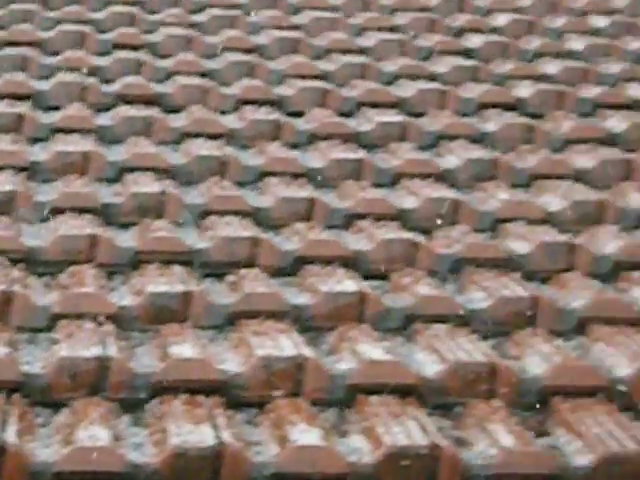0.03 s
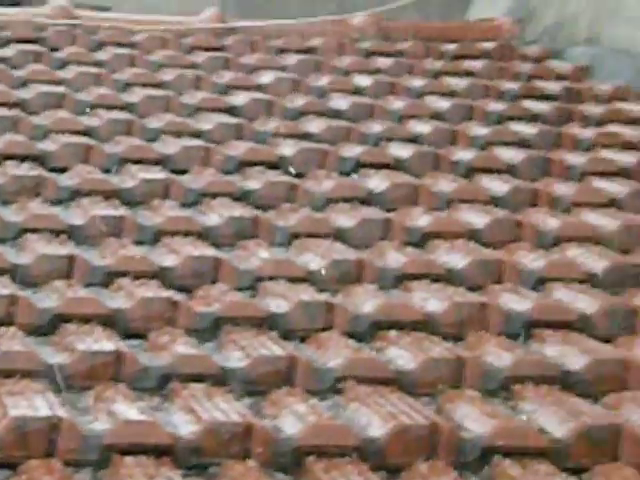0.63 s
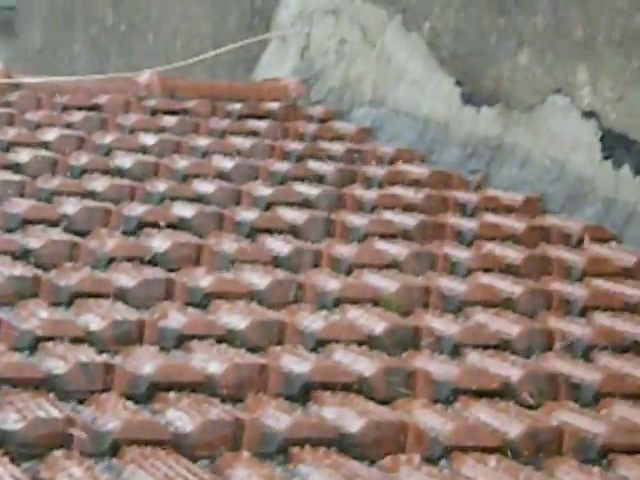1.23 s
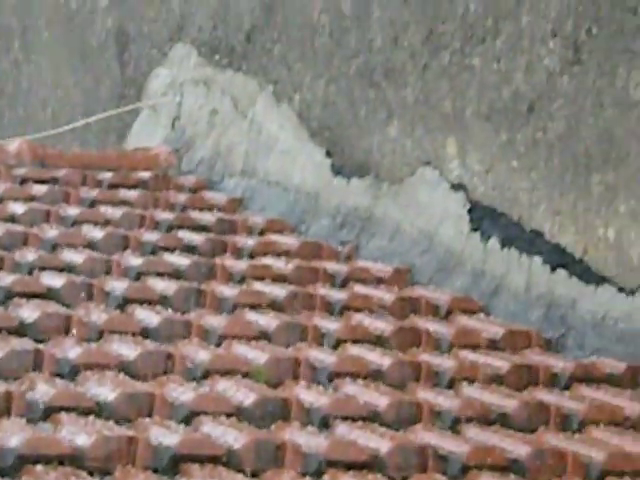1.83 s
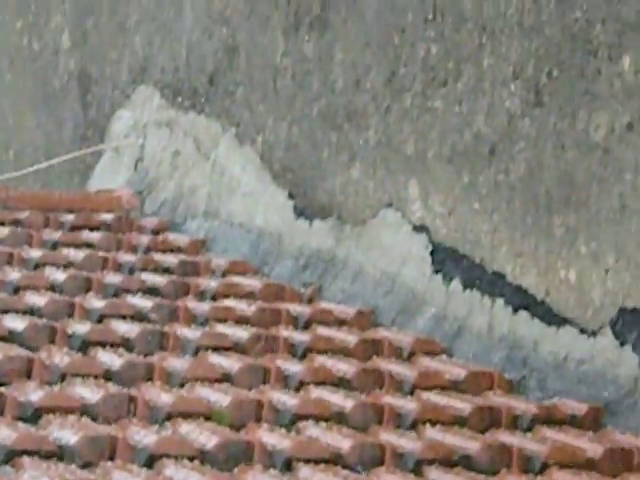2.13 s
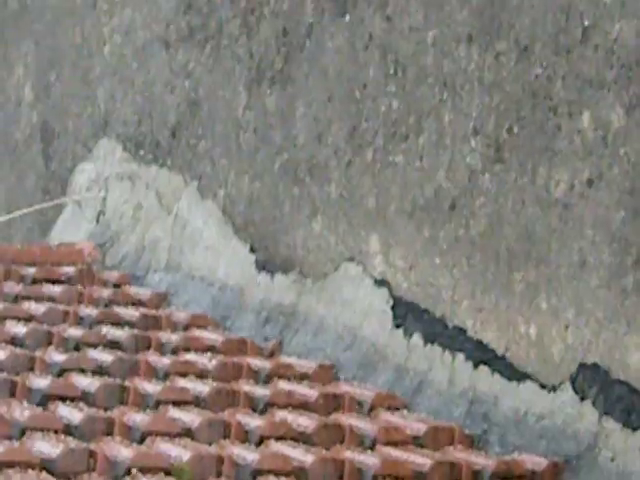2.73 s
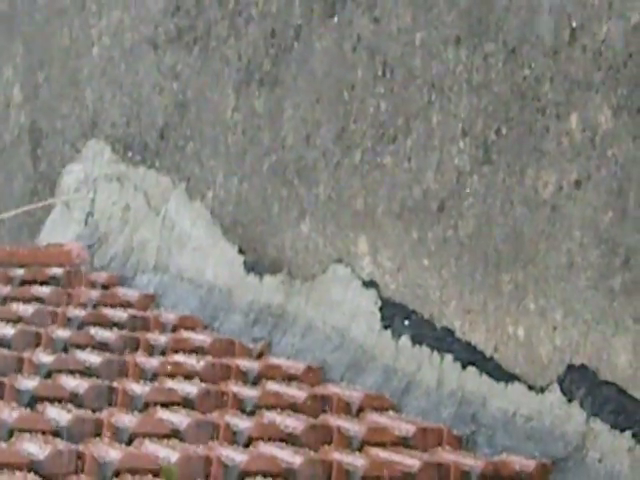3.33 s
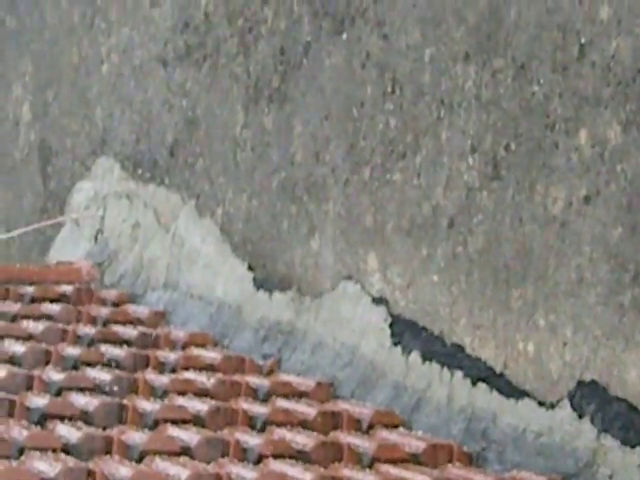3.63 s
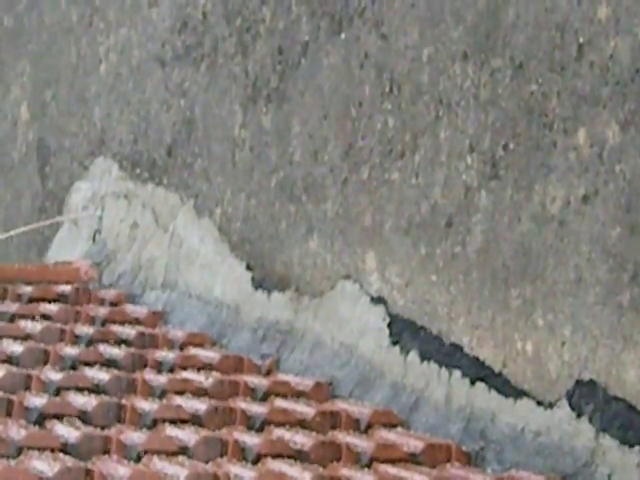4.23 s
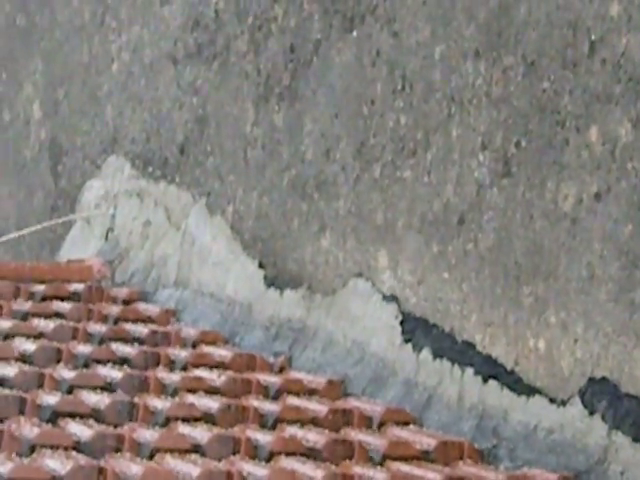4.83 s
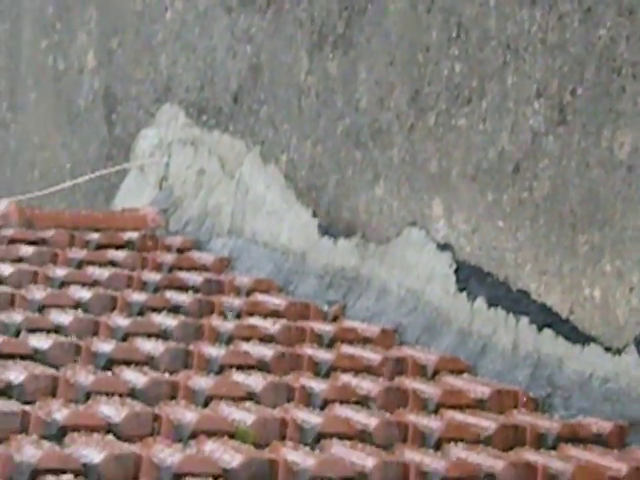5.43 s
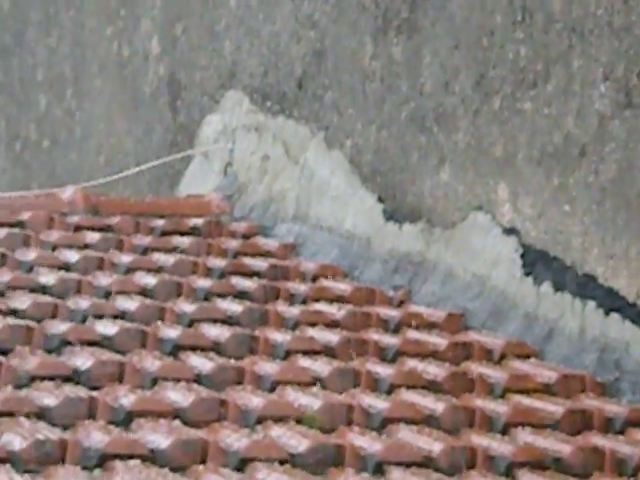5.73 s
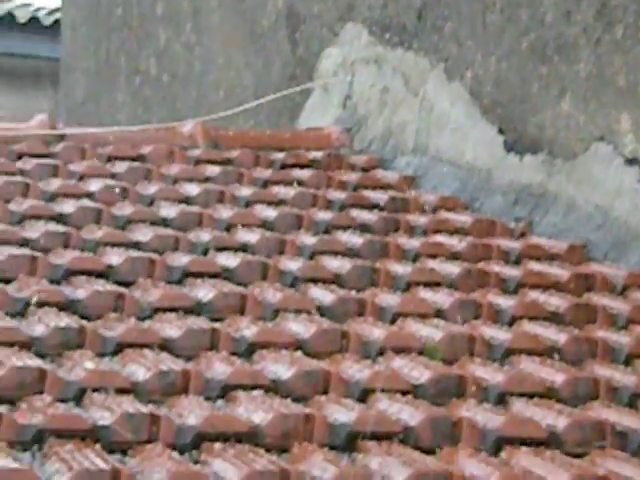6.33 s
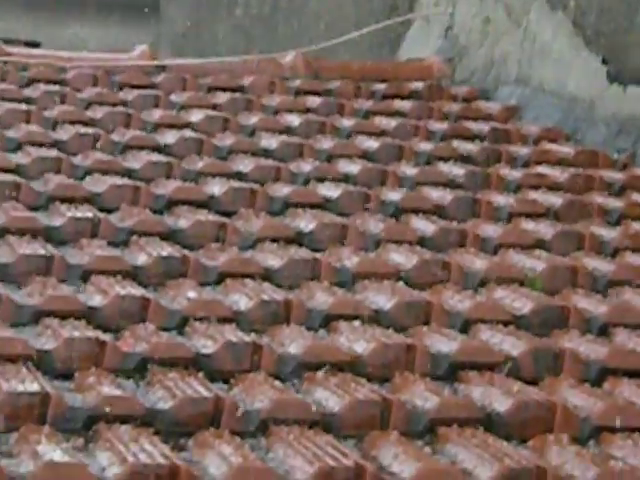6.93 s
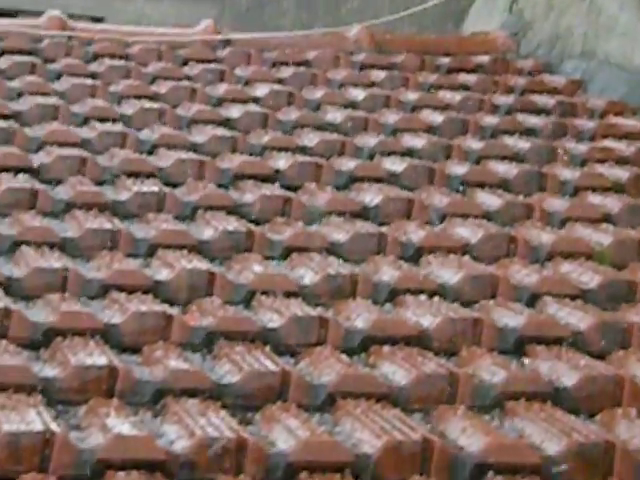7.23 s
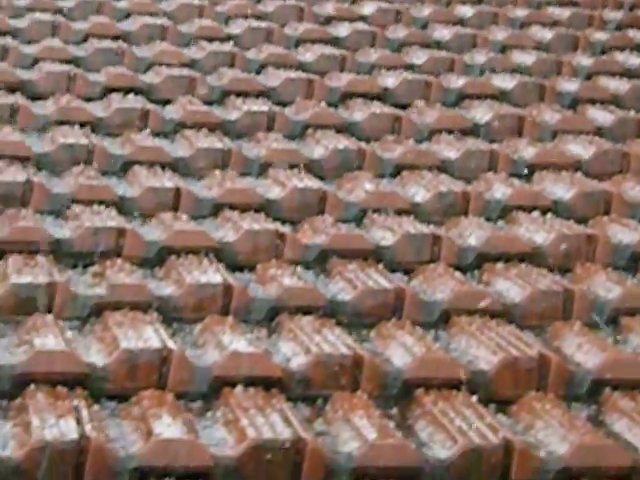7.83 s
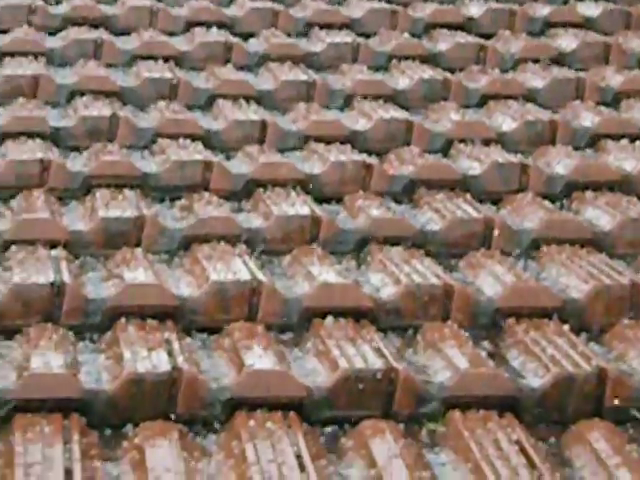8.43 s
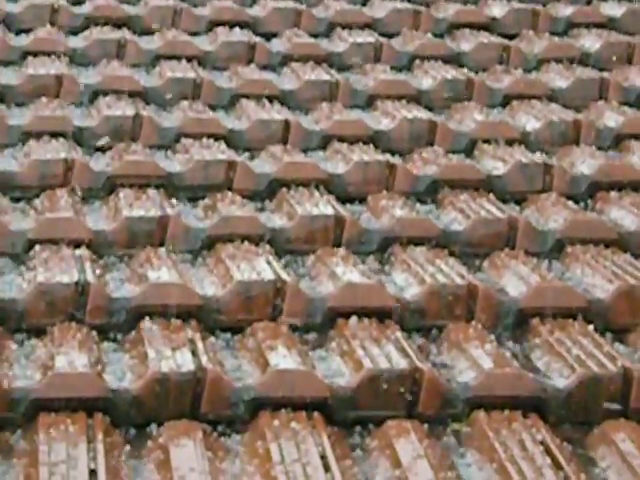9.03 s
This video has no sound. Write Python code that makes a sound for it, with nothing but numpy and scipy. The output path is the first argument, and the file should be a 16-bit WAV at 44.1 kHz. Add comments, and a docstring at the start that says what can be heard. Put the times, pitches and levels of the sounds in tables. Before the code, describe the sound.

Dense hail and rain pelt a tiled roof, with sharp cracks of bigger stones close by.

```python
"""A clay-tiled roof beside a concrete wall, pelted by small hail and rain.
Up front, single big stones crack on the tiles, set them ringing and shatter. Behind them smaller
stones and grains patter, tiles tink and knock, and countless far impacts merge into a wash.
Light wind nudges a narrow-band microphone, which overloads on the hardest cracks."""
import sys
import numpy as np
from scipy import signal
from scipy.io import wavfile

SR = 44100
rng = np.random.default_rng(int(sys.argv[2]) if len(sys.argv) > 2 else 0)


def waveform_to_disk(signal):
    """Save audio, clipped to [-1, 1], as 16-bit WAV at the path in sys.argv[1]."""
    frames = np.transpose(np.atleast_2d(signal))
    scaled = np.clip(frames, -1, 1) * 32767
    samples = np.round(scaled).astype(np.int16)
    wavfile.write(sys.argv[1], SR, samples)


N = 404838

# The shower's strength, swelling near 2 s and again from 6 s on. Each row: time in seconds, level in dB.
SHOWER_STRENGTH = [(0.0, -21), (0.6, -23), (1.5, -22.5), (1.85, -21), (2.25, -21.5), (3.0, -22.6),
                   (3.85, -21.5), (4.449, -23), (5.4, -22), (5.9, -20.5), (6.85, -21), (7.6, -20.5),
                   (8.2, -21), (8.55, -21.5), (9.18, -21.5)]
# Big hailstones close by. Each row: start in seconds, crack level in dB, clatter level in dB,
# brightness in dB, pitch of the struck tile in Hz.
BIG_STONES = [(0.008, -3, -22, 2, 560), (0.3253, 2, -17, 9, 1870), (0.733, -17, -23, -7, 1165),
              (0.811, -13, -21, -7, 1210), (1.1942, -10, -20, 3, 2650), (1.2857, -10, -15.5, -8, 2270),
              (1.505, -13.5, -20.5, -12, 400), (1.791, -7, -19, 0, 2370), (1.8484, -11, -19.5, -2, 2050),
              (1.9574, -9, -16, -5, 1126), (1.968, -7, -19.5, -3, 715), (2.1625, -1, -22, 10, 3400),
              (2.3094, -8.5, -17.5, -13, 880), (2.6052, -7, -13.5, 5, 2045),
              (2.9388, 2.5, -10.5, 6.5, 2675), (3.3192, -1.5, -14.5, 3.5, 3100),
              (3.5269, -10, -19, 2, 1970), (3.6598, -8, -18.5, -6, 696), (3.8855, -5, -19, -9, 826),
              (4.1596, -4.5, -19.5, 10.5, 3300), (4.3225, -2, -19, -4, 1950), (4.334, -7, -18.5, -3, 1010),
              (4.7423, -1.5, -16, -10, 842), (5.0864, -6, -14, 5.5, 483), (5.171, -6, -22, -1, 2150),
              (5.3862, -18, -19.5, 4, 703), (5.9243, -8, -16.5, 1, 3090), (6.001, -11, -16, 12, 3070),
              (6.4607, -14, -18, 16, 2760), (6.52, -15, -16, 11, 2940), (6.6982, -12, -19, -9, 1450),
              (7.3904, -3, -16, 18, 3320), (7.4515, -1, -15, 2, 2540), (8.2985, -2, -17.5, 4, 2590),
              (8.408, -12, -17.5, -2, 1120), (8.462, -15, -20.5, -11.5, 510),
              (8.5705, -7, -16.5, -12, 1380), (8.6898, 0, -14.5, 17, 2940), (8.8001, -4, -16.5, -1.5, 2570)]
# Resonances and hollows of the roof and wall. Each row: centre in Hz, width in Hz, boost or cut in dB.
ROOF_RESONANCES = [(150, 7, 4), (158, 11, -1.5), (205, 39, 3), (375, 180, -3.5), (417, 13, 5.5),
                   (476, 9.2, 5), (602, 120, 4), (690, 26, 4), (713, 41, -2.5), (958, 210, -2),
                   (1620, 190, 1.5), (2450, 1050, -1.5), (2750, 41, 2.5), (3080, 110, 1.5),
                   (3260, 820, 2.5)]
# Tone colour of the far impacts. Each row: frequency in Hz, relative spectral level in dB.
WASH_SPECTRUM = [(30, -11.5), (80, -6.5), (150, -2.5), (260, -3), (450, -4), (800, -3.5), (1200, 0.5),
                 (2000, -1), (3000, -1.5), (4200, 3)]
# Wind on the microphone. Each row: time of the crest in seconds, level in dB, spread in seconds.
WIND_PUFFS = [(4.617, -37, 0.077), (5.335, -32.5, 0.035), (5.46, -34, 0.022), (5.95, -47.5, 0.38),
              (7.284, -35, 0.024), (8.53, -37, 0.089)]

MIC_HZ = 4000  # top of the microphone's band


def big_stones(clatter_s=0.021, shortening=0.19):
    """The close hits: the brighter the stone, the shorter its clatter, as ice is done sooner than slush."""
    hits = []
    for start, crack_db, clatter_db, bright_db, tile_hz in BIG_STONES:
        decay_s = clatter_s * from_db(-shortening * bright_db)
        hits.append((start, strike(crack_db, clatter_db, decay_s, bright_db, tile_hz)))
    return lay_stones(hits)


def small_stones(count=1000, low_hz=450, high_hz=3950):
    """Smaller stones land all over the roof, each with its own size, hardness and tile."""
    hits = []
    for when, size, lasting, hardness, tile in rng.random((5, count)).T:
        level_db = 5 * size ** 2
        hit = strike(crack_db=level_db + 6.5, clatter_db=level_db, decay_s=0.013 * (.5 + lasting),
                     bright_db=15 * hardness - 4.5, tile_hz=low_hz + (high_hz - low_hz) * tile)
        hits.append((when * (N - 1) / SR, hit))
    return lay_stones(hits)


def strike(crack_db, clatter_db, decay_s, bright_db, tile_hz, ring_t60=0.056, samples=5000):
    """One stone: a sharp crack rings a tile, then a spray of shards and reflections rattles on it."""
    age = np.arange(samples) / SR
    band_share = 2 * MIC_HZ / SR  # the part of the spectrum that the microphone hears
    shards = rng.standard_normal(samples) / np.sqrt(band_share) * (age > .0005)
    spray = shards * from_db(clatter_db - 2.5) * np.exp(-(age / max(decay_s, .002)) ** 2)
    force = resonance(spray, tile_hz, width_hz=380, db=5.0)
    force[0] += from_db(crack_db) / band_share  # the crack is a single spike
    tile = from_db(clatter_db - 60 * age / ring_t60) * np.sin(2 * np.pi * tile_hz * age)
    return rng.choice([-1, 1]) * (contact(force, bright_db) + tile)


def contact(force, bright_db, split_hz=2300):
    """Hard ice snaps brightly, slush lands dull: treble trades against bass at about equal power."""
    bright = from_db(bright_db)
    bass, treble = butter(force, split_hz, "low"), butter(force, split_hz, "high")
    return (bass - bright * treble) / np.sqrt((1 + bright ** 2) / 2)


def lay_stones(hits):
    """Lay stones on the timeline; they are too light to make deep bass."""
    track = np.zeros(N)
    for start, hit in hits:
        at = round(start * SR)
        track[at:at + len(hit)] += hit[:N - at]
    return butter(track, 330, "high")


def patter():
    """Nearer grains land as a dense bed of ticks."""
    return butter(impacts(per_s=1600, spread_db=3.0), 400, "high")


def tile_pings(tiles=36, per_tile_s=6.0, ring_cycles=60):
    """Single tiles tink briefly, each at its own pitch."""
    pitches_hz = np.linspace(1100, 4200, tiles) * rng.uniform(0.97, 1.02, tiles)
    clicks = impacts(per_tile_s * tiles, spread_db=1.5)
    struck = rng.integers(0, tiles, N)
    # high modes die sooner, so they start louder for the same energy
    return sum(ring(clicks * (struck == k), hz, ring_cycles / hz) * np.sqrt(hz)
               for k, hz in enumerate(pitches_hz))


def tile_knocks(tiles=8, per_tile_s=7.4):
    """Loose tiles answer with a hollow knock."""
    pitches_hz = np.geomspace(470, 760, tiles)
    clicks = impacts(per_tile_s * tiles, spread_db=5.0)
    struck = rng.integers(0, tiles, N)
    return sum(ring(clicks * (struck == k), hz, t60=0.024) for k, hz in enumerate(pitches_hz))


def far_wash(flicker_db=1.36):
    """Far impacts merge into noise that flickers slightly in each half octave."""
    edges_hz = 22 * 2 ** np.arange(0, 8.6, .5)
    white = rng.standard_normal((2, N))  # neighbouring bands take different noise
    hz, db = np.transpose(WASH_SPECTRUM)
    wash = np.zeros(N)
    for k, (low, high) in enumerate(zip(edges_hz, edges_hz[1:])):
        level_db = np.interp(np.log(low * high) / 2, np.log(hz), db)
        band = butter(white[k % 2], [low, high], "band")
        wash += from_db(level_db + flicker_db * drift(rate_hz=13)) * band
    return wash


def wind(band_hz=(20, 80)):
    """Each puff on the microphone is a short swell of rumble."""
    t = np.arange(N) / SR
    swell = sum(from_db(db) * np.exp(-.5 * ((t - crest) / spread) ** 2) for crest, db, spread in WIND_PUFFS)
    return swell * unit_rms(butter(rng.standard_normal(N), band_hz, "band"))


def roof(x):
    """Every impact takes on the colour of the tiles and the air spaces under them."""
    for hz, width_hz, db in ROOF_RESONANCES:
        x = resonance(x, hz, width_hz, db)
    return x


def impacts(per_s, spread_db):
    """Randomly timed clicks, many small and few large."""
    sizes = from_db(spread_db * np.minimum(rng.exponential(1, N), 4))
    return sizes * rng.choice([-1, 1], N) * (rng.random(N) < per_s / SR)


def ring(x, hz, t60):
    """A damped mode: a unit click rings with height 1 and falls 60 dB in t60 seconds."""
    decay, step = from_db(-60 / (t60 * SR)), 2 * np.pi * hz / SR
    return signal.lfilter([np.sin(step), 0], [1, -2 * decay * np.cos(step), decay ** 2], x + 1e-18)


def resonance(x, hz, width_hz, db):
    """A bell-shaped boost, or a hollow when db is negative."""
    gain, width = from_db(db / 2), np.pi * width_hz / SR
    tuning = -2 * np.cos(2 * np.pi * hz / SR)
    return signal.lfilter([1 + width * gain, tuning, 1 - width * gain],
                          [1 + width / gain, tuning, 1 - width / gain], x)


def drift(rate_hz, hop=40, settle=2000):
    """A slow random wander of unit rms."""
    pole = np.exp(-2 * np.pi * rate_hz * hop / SR)
    noise = rng.standard_normal(N // hop + settle + 2)
    slow = signal.lfilter([1], [1, -2 * pole, pole ** 2], noise)[settle:]
    return np.interp(np.arange(N) / hop, np.arange(len(slow)), unit_rms(slow))


def butter(x, hz, kind, order=2):
    """Causal Butterworth filter."""
    return signal.sosfilt(signal.butter(order, hz, kind, fs=SR, output="sos"), x + 1e-18)


def from_db(db):
    """Decibels to gain."""
    return 10 ** (np.asarray(db) / 20)


def unit_rms(x):
    """Scale to unit rms."""
    return x / np.sqrt(np.mean(x ** 2) + 1e-20)


def fader(x, db):
    """Set a layer's rms level within the microphone's band."""
    return from_db(db) * x / np.std(butter(x, MIC_HZ, "low", order=8))


def scene(split_hz=2500, mean_strength_db=-19.5):
    """The shower swells and eases, splashing more brightly as it grows; big stones stand out of it."""
    shower = (fader(patter(), db=-5) + fader(far_wash(), db=0) + fader(small_stones(), db=-5)
              + fader(tile_pings(), db=-7.5) + fader(tile_knocks(), db=-17.5))
    strength_db = np.interp(np.arange(N) / SR, *np.transpose(SHOWER_STRENGTH))
    splash_db = 0.66 + 0.15 * (strength_db - mean_strength_db)
    drumming = butter(shower, split_hz, "low", order=3)
    splashing = from_db(splash_db) * butter(shower, split_hz, "high", order=3)
    hail = from_db(strength_db) * (drumming + splashing) + big_stones()
    return (roof(hail) + wind())[None]


def record(dry, soft_limit=0.86, hard_limit=0.81, smoothing_hz=3910, cutoff_hz=15800):
    """A narrow-band recorder rounds the peaks; the hardest cracks clip and spit a tick of treble."""
    narrow_rate, steps = 2 * MIC_HZ, SR // 100
    fine_rate = narrow_rate * steps
    # the input filter is a little too wide, so the top edge folds back on itself
    input_filter = signal.firwin(80 * steps + 1, 1.008 * MIC_HZ, fs=fine_rate)
    narrow = signal.resample_poly(dry[0], narrow_rate, SR, window=input_filter)
    rounded = narrow / (1 + (narrow / soft_limit) ** 6) ** (1 / 6)
    smoothing = signal.firwin(23 * steps, smoothing_hz, window=("kaiser", 6.5), fs=fine_rate)
    # hard cracks overshoot between the narrow-band samples
    smoothed = signal.resample_poly(rounded, SR, narrow_rate, window=smoothing)[:N]
    clipped = np.clip(smoothed, -hard_limit, hard_limit)
    top_cut = signal.ellip(10, .3, 80, cutoff_hz, fs=SR, output="sos")
    return signal.sosfilt(top_cut, clipped)[None]


dry = scene()
out = record(dry)
waveform_to_disk(out)
```